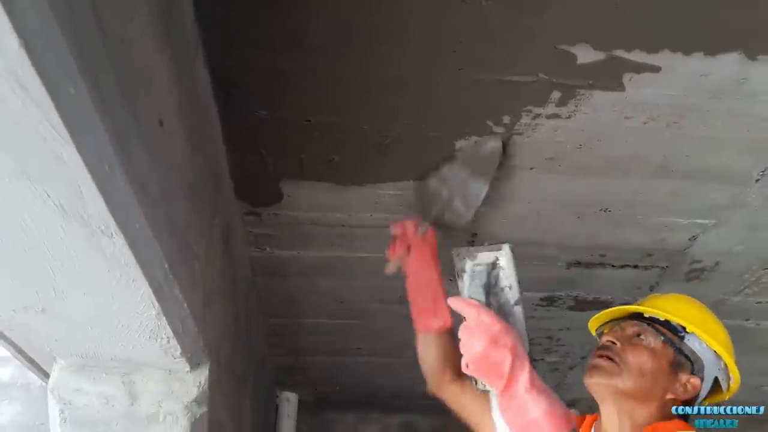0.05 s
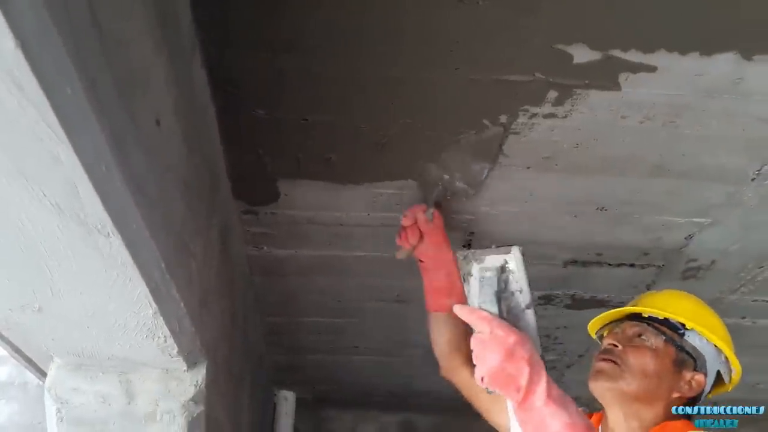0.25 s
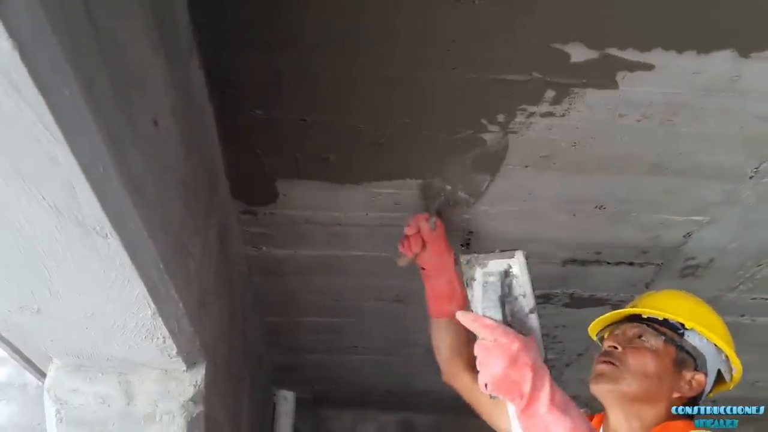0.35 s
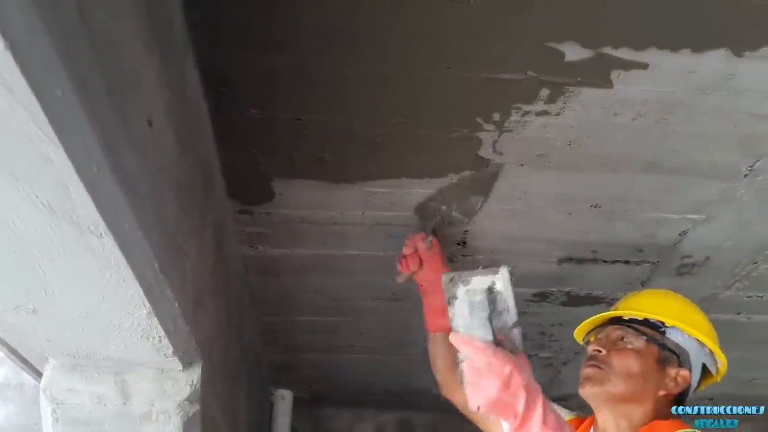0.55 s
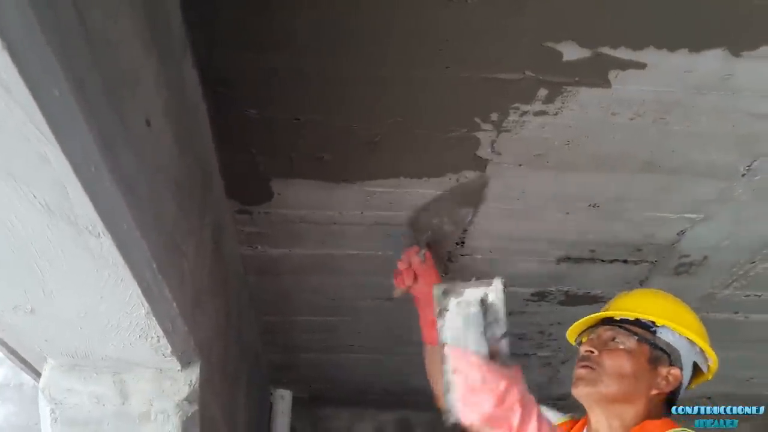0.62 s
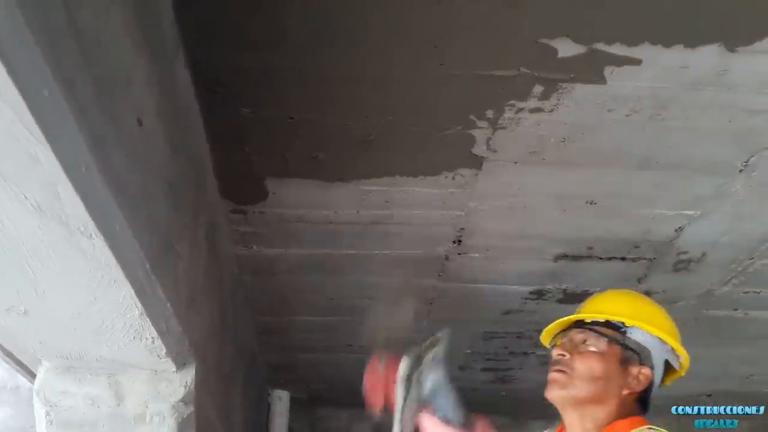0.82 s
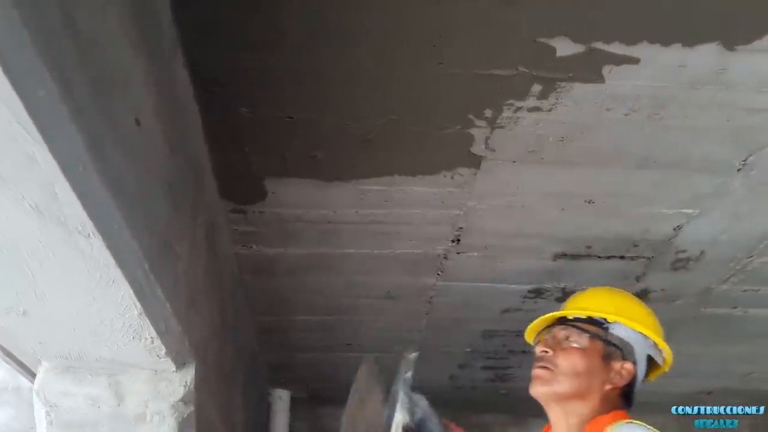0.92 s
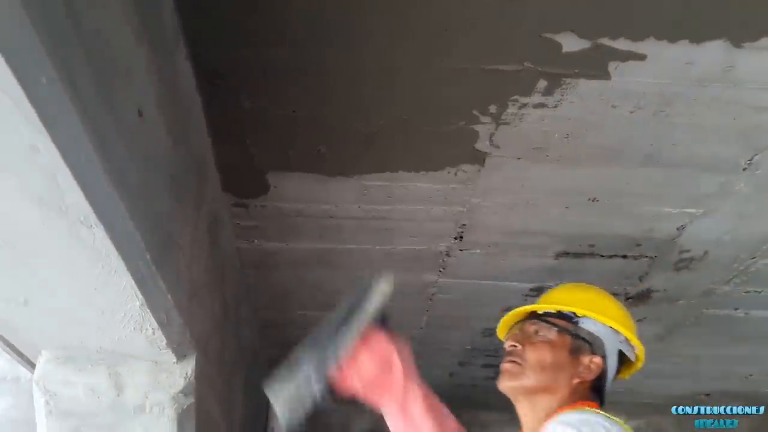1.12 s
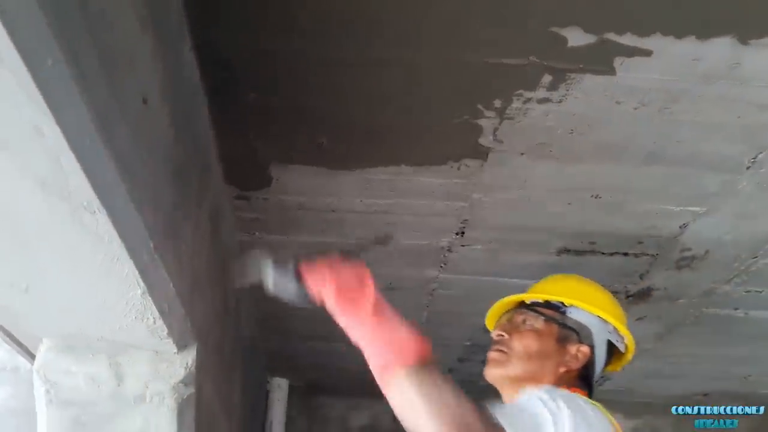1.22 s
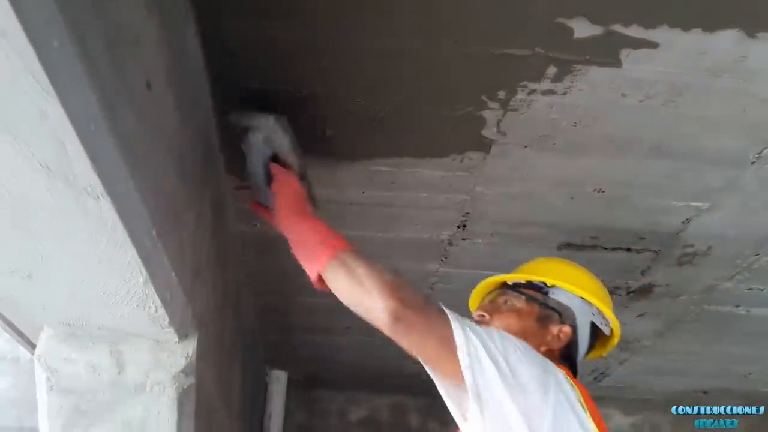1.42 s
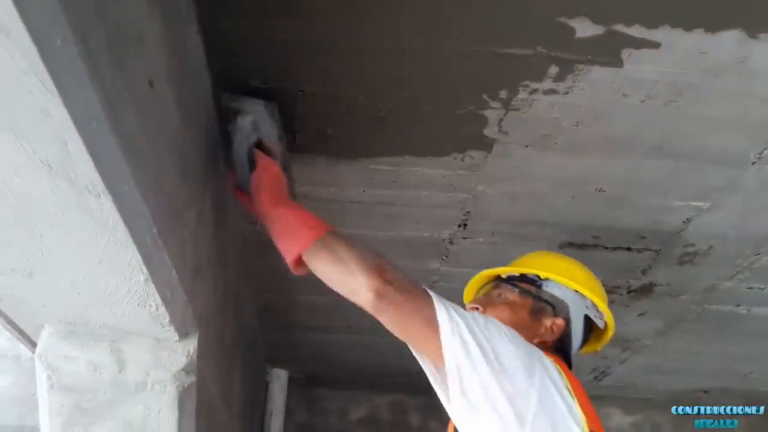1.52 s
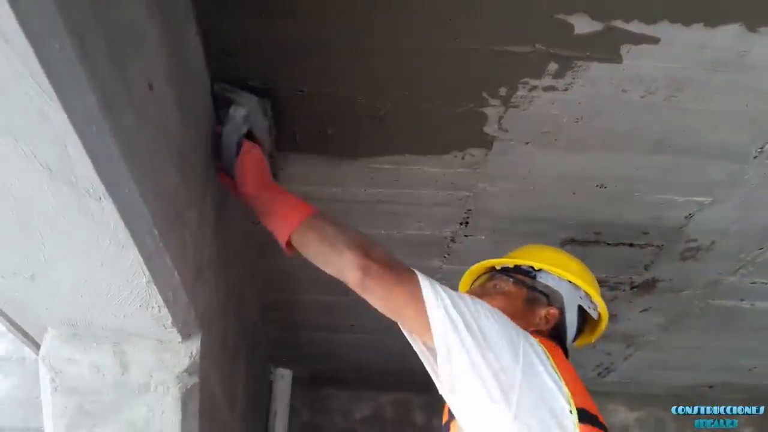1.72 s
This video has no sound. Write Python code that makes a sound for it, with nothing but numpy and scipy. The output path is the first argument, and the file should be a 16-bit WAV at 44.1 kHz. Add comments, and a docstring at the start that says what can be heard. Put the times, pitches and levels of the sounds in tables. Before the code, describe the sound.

A steel trowel scrapes wet mortar on a concrete ceiling. It lands with a damp clink at 0.2 seconds, then makes a gritty, faintly ringing push and pull from 0.3 to 0.8, ending in a rising rasp. Faint smears follow, with a hollow tool knock at 1.0, a soft thud at 1.2 and small taps around 1.5 and 1.7. The bare room reverberates over a low building site rumble.

```python
"""A steel trowel lands on a concrete ceiling and is worked to and fro through wet mortar.
Sand grains strike the blade as a dense train of impulses: heard directly they hiss, and as a
driving force they excite its damped modes, most strongly where coarse grains catch.
Faint smears, a tool knock, a soft thud and small taps follow. A bare concrete room adds early
reflections and a reverberant tail, over the low rumble of a building site."""
import sys
import numpy as np
from scipy import signal
from scipy.fft import rfft, irfft
from scipy.io import wavfile

SR = 44100
rng = np.random.default_rng(int(sys.argv[2]) if len(sys.argv) > 2 else 0)


def bounce(signal):
    """Save signal as a 16-bit WAV file at the path given by the first command-line argument."""
    frames = np.transpose(np.atleast_2d(signal))
    limited = np.clip(frames, -1, 1)
    pcm = np.round(limited * 32767).astype(np.int16)
    wavfile.write(sys.argv[1], SR, pcm)


N = 77175


def amp(db):
    return 10 ** (np.asarray(db) / 20)


def times():
    return np.arange(N) / SR


def unit(x):
    return x / np.sqrt(np.mean(x ** 2))


def by_hz(points, hz):
    """Interpolation on a logarithmic frequency axis."""
    freqs, values = np.array(points).T
    return np.interp(np.log(hz + 1), np.log(freqs), values)


def convolve(x, response):
    return signal.fftconvolve(x, response)[:N]


def equalise(x, points):
    """Zero-phase filtering by a curve of gains in dB."""
    return irfft(rfft(x) * amp(by_hz(points, np.fft.rfftfreq(N, 1 / SR))), N)


def colour(x, points, size=4096):
    """Minimum-phase filtering: a causal response of unit energy with the given spectral shape."""
    cepstrum = irfft(np.log(amp(by_hz(points, np.fft.rfftfreq(size, 1 / SR)))))
    response = irfft(np.exp(rfft(2 * cepstrum * (np.arange(size) < size // 2))))
    return convolve(x, response / np.linalg.norm(response))


def ring(force, modes, size=12000):
    """Modal superposition: a force drives damped sinusoids (pitch_hz, t60_s, energy_db)."""
    t, response = np.arange(size) / SR, 0
    for k, (hz, t60, db) in enumerate(modes):
        mode = np.sin(2 * np.pi * hz * t) * np.exp(-np.log(1000) * t / t60)
        response = response + (-1) ** k * amp(db) * mode / np.linalg.norm(mode)
    return convolve(force, response)


def wander(rate_hz):
    """Interpolated noise: a slow fluctuation of unit RMS."""
    return unit(np.interp(times() * rate_hz, np.arange(N), rng.standard_normal(N)))


def grit(grains_per_s=7000, spread_db=5):
    """Shot noise: sand grains of uneven size click at random instants."""
    chance, size = rng.random(N) * 2 - 1, rng.standard_normal(N)
    hit = np.abs(chance) < grains_per_s / SR
    return unit(hit * np.sign(chance) * amp(spread_db * np.clip(size, -2, 2)))


def bursts(starts, levels_db, decays, rise_s=0.00056, size=9000):
    """Transient envelopes: a linear attack, then exponential decay."""
    t, out = np.arange(size) / SR, np.zeros(N + size)
    attack = np.minimum(t / rise_s, 1)
    for start, db, decay in zip(starts, levels_db, decays):
        i = min(int(start * SR), N)
        out[i:i + size] += amp(db) * attack * np.exp(-np.maximum(t - rise_s, 0) / decay)
    return out[:N]


def blows(rows):
    """Impulsive excitation: one impulse for each (start_s, level_db)."""
    force = np.zeros(N)
    for start, db in rows:
        force[int(start * SR)] = amp(db)
    return force


# spectra of the steady rumble and of its deep swells: frequency_hz, density_db
RUMBLE_SPECTRUM = [(20, 8), (40, -25), (65, 1), (110, 4), (190, 2), (300, -2), (500, -3.5), (750, -10),
                   (1400, -15), (2100, -17.5), (3000, -25), (5000, -30.5), (8000, -36), (9500, -42.5),
                   (12000, -35.5), (15500, -36.5)]
SWELL_SPECTRUM = [(20, -18), (45, -6), (72, 2), (110, -12), (200, -27), (1000, -68)]
# weighting of the left-right difference: frequency_hz, gain_db
RUMBLE_WIDTH = [(50, -14), (130, -16), (300, -12), (900, 2.5), (3000, 0.5), (12000, 0.5)]
# envelope of the rumble: time_s, level_db
RUMBLE_LEVEL = [(0, -48.5), (.22, -48.5), (.9, -47), (1.4, -45.5), (1.75, -49)]
# deep swells: peak_s, level_db, half_length_s
SWELLS = [(1.37, -50.5, .06), (1.68, -55, 0.091)]
def site_rumble():
    """Interaural coherence: the rumble is alike in both ears in the bass, wide in the treble."""
    t = times()
    mid, side = (colour(rng.standard_normal(N), RUMBLE_SPECTRUM) for _ in range(2))
    side = equalise(side, RUMBLE_WIDTH)
    level = amp(np.interp(t, *np.array(RUMBLE_LEVEL).T))
    swell = sum(amp(db) * np.exp(-((t - peak) / half) ** 2) for peak, db, half in SWELLS)
    deep = colour(rng.standard_normal(N), SWELL_SPECTRUM) * swell
    return np.array([mid + side, mid - side]) * level + deep


# modes of the steel blade, landing flat, pushed, and pulled on its edge:
# pitch_hz, t60_s, flat_db, push_db, pull_db
BLADE_MODES = [(580, 0.099, -23.5, -19.5, -28), (787.4, .13, -6, -17, -20.5), (878, 0.28, -13, -19.5, -12),
               (1067.4, 0.21, -47, -22, -15), (1267, 0.091, -7, -18.5, -28), (1405, 0.093, -9, -10, -37),
               (1501, .07, -8, -4.5, -11), (1574.8, .1, -14, -7.5, -0.5), (1670, 0.033, -1.5, -6.5, -7),
               (1813, 0.044, -14, -21, -25), (2055, 0.15, -3.5, -23, -16), (2223, 0.019, -7, -19, -8.5),
               (2376, 0.057, -11.5, -10, -8.5), (2598, 0.15, -31, -18, -9.5), (5260, .02, -26, -28, -9)]
# contacts of the loaded blade: start_s, ring_db, squelch_db, decay_s
LANDINGS = [(.2195, -33.5, -31, 0.0035), (0.2222, -24, -26, 0.0046), (0.231, -26, -30.5, 0.0094),
            (.256, -40, -37.5, 0.024)]
# mortar squeezing out: frequency_hz, density_db
SQUELCH_SPECTRUM = [(60, -12), (250, -1), (450, -2), (1000, -5.5), (1900, 1.5), (3200, -2), (4700, -9),
                    (5900, -8.5), (6500, -16), (7000, -9.5), (8200, -12), (9600, -19.5), (12000, -15.5),
                    (15500, -24)]
# low mode of the slab: pitch_hz, t60_s, energy_db
SLAB_MODE = [(58.4, 0.18, -10.5)]
def blade_landing(t60_scale=.45):
    """Damped impact: mortar shortens the blade's ring and squeezes out; the slab answers with a bump."""
    start, ring_db, squelch_db, decay = np.array(LANDINGS).T
    hz, t60, flat_db = np.array(BLADE_MODES).T[:3]
    steel = ring(grit() * bursts(start, ring_db, decay), zip(hz, t60_scale * t60, flat_db))
    squelch = colour(grit() * bursts(start, squelch_db, decay), SQUELCH_SPECTRUM)
    bump = ring(blows([(start[0], 0)]), SLAB_MODE)
    return steel + squelch + bump


# envelope of the stroke: time_s, force_db, hiss_db
STROKE = [(0.309, -47, -46), (.345, -48, -44.5), (0.371, -43, -39), (.40, -34, -31), (.44, -37.5, -33),
          (.485, -38.5, -35.5), (.505, -42.5, -34.5), (.555, -58, -35), (.60, -32, -30.5),
          (.632, -50, -35.5), (.668, -35.5, -30), (.70, -39.5, -34.5), (0.723, -45, -35.5),
          (.752, -50, -33.5), (0.774, -38.5, -49), (.81, -88, -60)]
# the blade catches on coarse grains: start_s, ring_db, crunch_db, decay_s
CATCHES = [(.346, -24.5, -29.5, .002), (.362, -47, -29.5, 0.0028), (0.3834, -35, -25, 0.0026),
           (.388, -27, -33, 0.0023), (0.402, -25, -41, .004), (.434, -30, -36, .003),
           (0.4601, -23, -23, .0025), (0.473, -20.5, -39, 0.006), (0.506, -24, -34, 0.0029),
           (0.605, -39, -39, 0.004), (0.639, -24, -31.5, 0.0043), (0.681, -24, -49, 0.0038),
           (0.711, -23.5, -30.5, 0.0033), (.716, -25, -31, 0.0058), (0.746, -23.5, -32.5, 0.0019),
           (.769, -36.5, -44, 0.0025)]
# sand under the blade: frequency_hz, density_db
SAND_SPECTRUM = [(100, -26.5), (300, -6), (550, -10.5), (1150, -7), (1600, 0.5), (2500, -0.5), (3100, -2.5),
                 (4200, -3.5), (5600, -4), (6500, -7.5), (8200, -9.5), (9500, -18), (12300, -15.5),
                 (15500, -24)]
def blade_scrape(turn_s=0.596, turn_length_s=.1, judder_db=1.5):
    """Frictional excitation: sand hisses and rings the juddering blade, whose tilt reweights its modes."""
    t = times()
    at, force_db, hiss_db = np.array(STROKE).T
    start, ring_db, crunch_db, decay = np.array(CATCHES).T
    hz, t60, _, push_db, pull_db = np.array(BLADE_MODES).T
    judder = amp(judder_db * wander(rate_hz=160)) * (t > at[0]) * (t < at[-1])
    force = grit() * (judder * amp(np.interp(t, at, force_db)) + bursts(start, ring_db, decay))
    sand = grit() * (judder * amp(np.interp(t, at, hiss_db)) + bursts(start, crunch_db, decay))
    tilt = np.clip((t - turn_s) / turn_length_s + .5, 0, 1)  # 0 on the push, 1 on the pull
    pushed = ring(force * (1 - tilt), zip(hz, t60, push_db))
    pulled = ring(force * tilt, zip(hz, t60, pull_db))
    return pushed + pulled + colour(sand, SAND_SPECTRUM)


def resonance(x, hz, width_hz):
    """Heterodyning: shift down, low-pass and shift back to make a resonator with a moving centre."""
    carrier = np.exp(2j * np.pi * np.cumsum(hz) / SR)
    pole = np.exp(-np.pi * width_hz / SR)
    return (carrier * signal.lfilter([1], [1, -pole], x / carrier)).real


# rasp of the blade tipping onto its edge: time_s, pitch_hz, level_db
RASP = [(.63, 1700, -66), (.645, 1800, -35.5), (.675, 2020, -34), (.70, 2240, -36), (.725, 2550, -45),
        (.76, 2600, -60)]
# hard grains against the steel: start_s, pitch_hz, force_db, decay_s
SQUEAKS = [(0.385, 3740, -28, 0.0056), (0.388, 4950, -27, 0.0045), (0.461, 4260, -24.5, .005),
           (0.594, 5320, -38, .012), (0.647, 6700, -36, .008), (0.664, 8050, -30.5, 0.0057)]
def blade_edge(rasp_width_hz=230, squeak_t60_s=0.013):
    """Narrow-band resonance: grit on the blade's edge drives a climbing rasp and brief squeaks."""
    t, grains = times(), grit()
    at, rasp_hz, rasp_db = np.array(RASP).T
    rasp = unit(resonance(grains, np.interp(t, at, rasp_hz), rasp_width_hz))
    out = rasp * np.interp(t, at, amp(rasp_db), left=0, right=0)
    for start, hz, db, decay in SQUEAKS:
        out += ring(grains * bursts([start], [db], [decay]), [(hz, squeak_t60_s, 0)])
    return out


# faint smears of mortar: peak_s, level_db, rise_s, fall_s
SMEARS = [(0.914, -52, 0.023, 0.066), (1.04, -48.5, 0.075, 0.12), (1.22, -51, 0.013, 0.1),
          (1.745, -53.5, 0.017, .03)]
# their spectrum: frequency_hz, density_db
SMEAR_SPECTRUM = [(200, -8), (1000, 6), (2300, 3.5), (3300, -3), (6500, -8), (8200, -9), (9400, -18.5),
                  (12500, -12.5), (15500, -22)]
def mortar_smears():
    """Amplitude modulation: grain noise swells and fades with each smear of wet mortar."""
    t = times()
    envelope = sum(amp(db) * np.exp(-np.maximum((peak - t) / rise, (t - peak) / fall))
                   for peak, db, rise, fall in SMEARS)
    return colour(grit() * envelope, SMEAR_SPECTRUM)


# blows of a tool: start_s, force_db
KNOCKS = [(.9838, -4), (.9885, -12), (.994, -14)]
# its modes: pitch_hz, t60_s, energy_db
KNOCK_MODES = [(303, 0.11, -11), (474, 0.1, -12.5), (573, .09, -6.5), (613, .09, -8.5), (813, .08, -7),
               (1255, 0.055, -10), (1418, .04, -8), (1796, 0.06, -8), (2250, 0.072, -7), (2750, .05, -19.5)]
# its dull clatter: frequency_hz, density_db
CLATTER_SPECTRUM = [(50, -20), (150, -11), (350, -1.5), (600, -2), (1000, -3.5), (2500, -4.5),
                    (3300, -17.5), (15000, -31)]
def tool_knock(click_db=-17, clatter_db=-34, clatter_s=0.021):
    """Impulse response: a struck tool gives a short hollow ring, with a gritty click and a clatter."""
    force = blows(KNOCKS)
    click = amp(click_db) * colour(force, SMEAR_SPECTRUM)
    clatter = colour(grit() * bursts([KNOCKS[0][0]], [clatter_db], [clatter_s]), CLATTER_SPECTRUM)
    return ring(force, KNOCK_MODES) + click + clatter


# bumps of a tool being handled: start_s, force_db
THUDS = [(1.208, -0.5), (1.2285, -13), (1.271, -8.5)]
# its modes: pitch_hz, t60_s, energy_db
THUD_MODES = [(118.6, 0.25, -8), (214, 0.075, -6.5), (247, .12, -1), (317, 0.11, -8), (686, 0.022, -21)]
def tool_thud():
    """Free decay of low modes: a handled tool gives a soft double thud."""
    return ring(blows(THUDS), THUD_MODES)


# small taps of the tools: start_s, level_db
TAPS = [(1.465, -50), (1.534, -46), (1.744, -50)]
# their spectrum: frequency_hz, density_db
TAP_SPECTRUM = [(200, -2), (1000, 8.5), (1900, 16), (3000, -8), (8000, -13), (15000, -22)]
def tool_taps(decay_s=.004):
    """Broadband transients: each light contact is a brief burst of filtered grain noise."""
    start, db = np.array(TAPS).T
    return colour(grit() * bursts(start, db, np.full(len(start), decay_s)), TAP_SPECTRUM)


# reverberation time of the concrete room: frequency_hz, t60_s
ROOM_T60 = [(150, 0.47), (500, 0.75), (1500, 0.5), (4000, 0.51), (12000, 0.24)]
def diffuse_tail(build_s=0.0086):
    """Reverberation: a diffuse field builds up, then decays at its own rate in each band."""
    t, freqs = times(), np.fft.rfftfreq(N, 1 / SR)
    noise, tail = rfft(rng.standard_normal(N)), 0
    for centre_hz, t60 in ROOM_T60:
        band = by_hz([(hz, hz == centre_hz) for hz, _ in ROOM_T60], freqs)
        fade = np.exp(-np.log(1000) * t / t60) * (1 - np.exp(-t / build_s))
        tail = tail + irfft(noise * band, N) * fade / np.linalg.norm(fade)
    return tail


# colouring of the reflected sound: frequency_hz, gain_db
REFLECTION_GAIN = [(100, -3.5), (400, 0), (1200, -1), (5000, 0), (15000, 4.5)]
def room(source, wet_db, lag_ms, pan_db, early_decay_s=0.012, early_db=-3.5, tail_db=-8.5):
    """Superposition of paths: direct sound, early ceiling reflections and the tail reach each ear."""
    t, freqs = times(), np.fft.rfftfreq(N, 1 / SR)
    spectrum, ears = rfft(source()), []
    for side in (1, -1):
        tail = amp(tail_db) * diffuse_tail()
        early = rng.standard_normal(N) * (rng.random(N) < .06) * np.exp(-t / early_decay_s)
        early *= amp(early_db) / np.linalg.norm(early)
        direct = irfft(spectrum * np.exp(-1j * np.pi * freqs * side * lag_ms / 1000), N)
        # grains lie all along the blade, so each path carries its own mix of them
        reflected = convolve(source(), equalise(tail + early, REFLECTION_GAIN))
        ears.append(amp(side * pan_db / 2) * (direct + amp(wet_db) * reflected))
    return np.array(ears)


def scene():
    """Linear superposition: each source sounds in the room, over the rumble of the site."""
    return (room(blade_landing, wet_db=3, lag_ms=0.031, pan_db=0.0)
            + room(blade_scrape, wet_db=1.5, lag_ms=0.043, pan_db=0.5)
            + room(blade_edge, wet_db=2.5, lag_ms=0.049, pan_db=-1.5)
            + room(mortar_smears, wet_db=1.5, lag_ms=0.016, pan_db=0.5)
            + room(tool_knock, wet_db=5, lag_ms=0.075, pan_db=1.0)
            + room(tool_thud, wet_db=-8, lag_ms=0.042, pan_db=-0.2)
            + room(tool_taps, wet_db=1.5, lag_ms=0.016, pan_db=0.5)
            + site_rumble())


def record(dry, cutoff_hz=15900):
    """Band limiting: a steep elliptic low-pass removes the highest treble."""
    return signal.sosfilt(signal.ellip(10, .2, 80, cutoff_hz, fs=SR, output="sos"), dry)


dry = scene()
out = record(dry)
bounce(out)
```